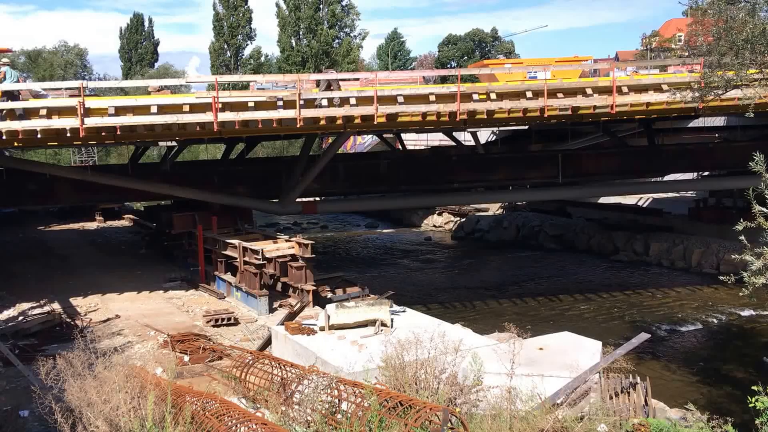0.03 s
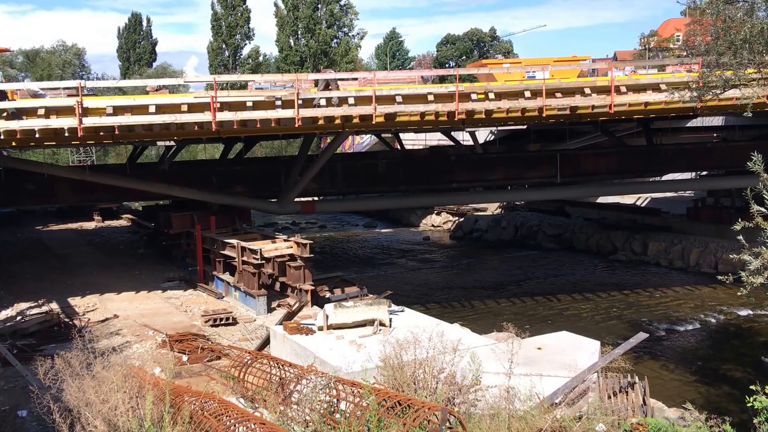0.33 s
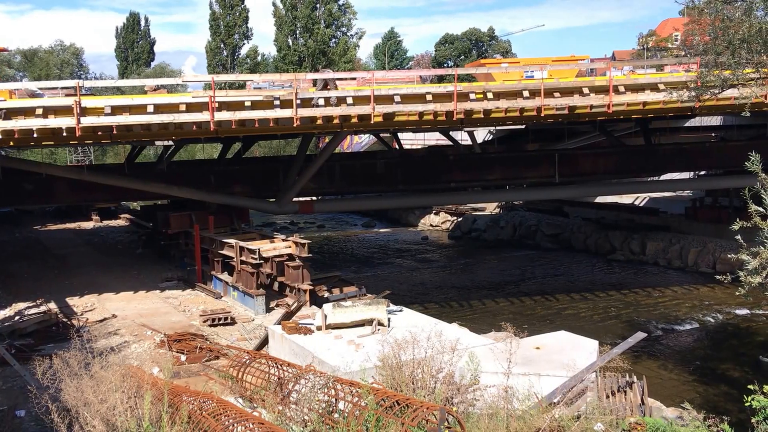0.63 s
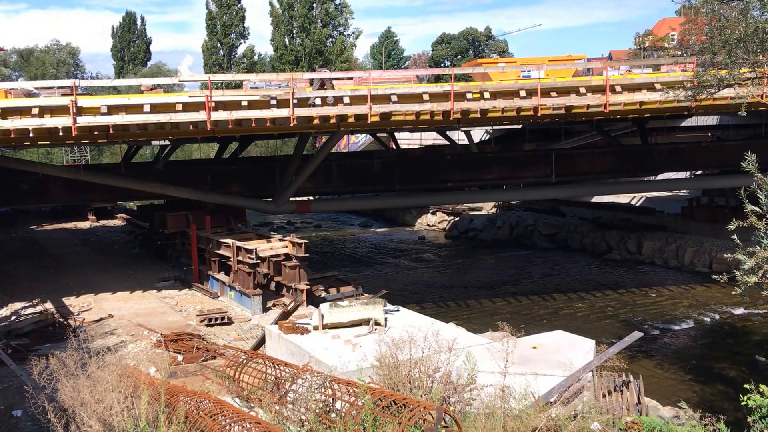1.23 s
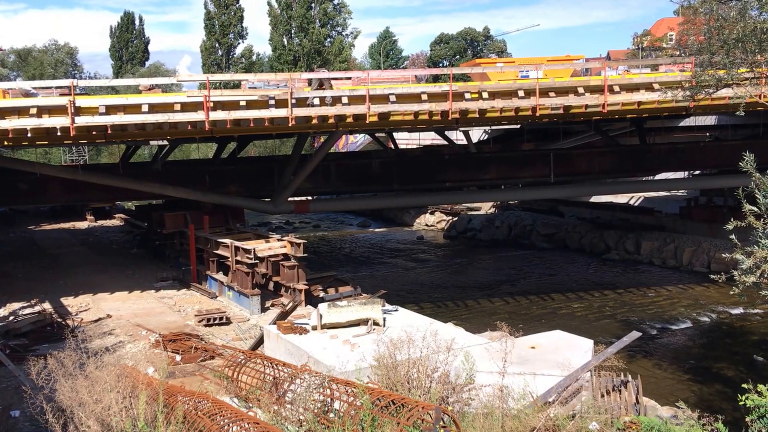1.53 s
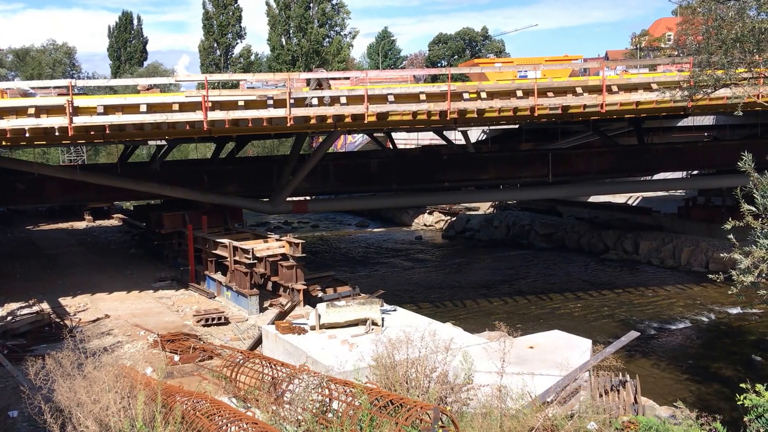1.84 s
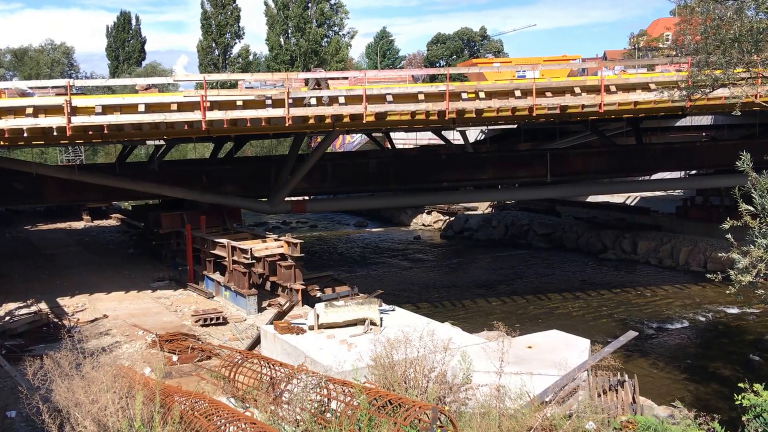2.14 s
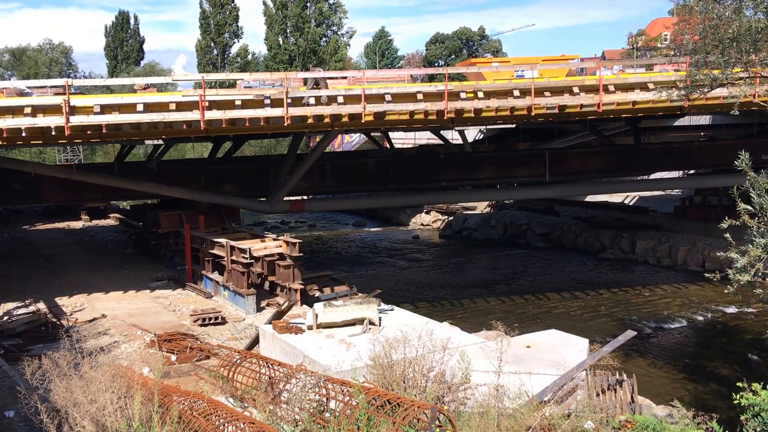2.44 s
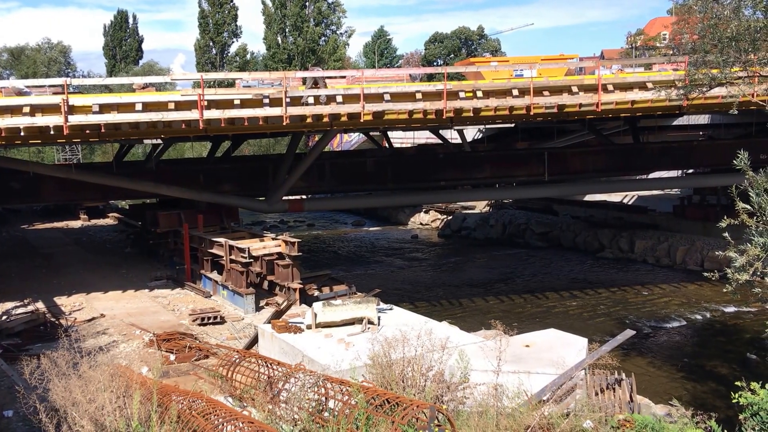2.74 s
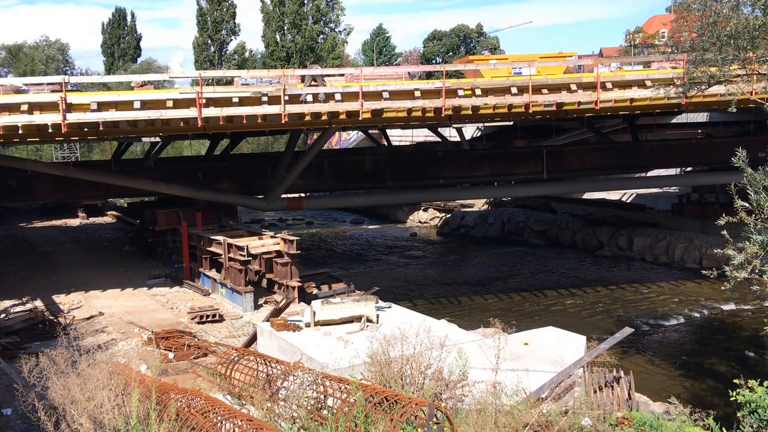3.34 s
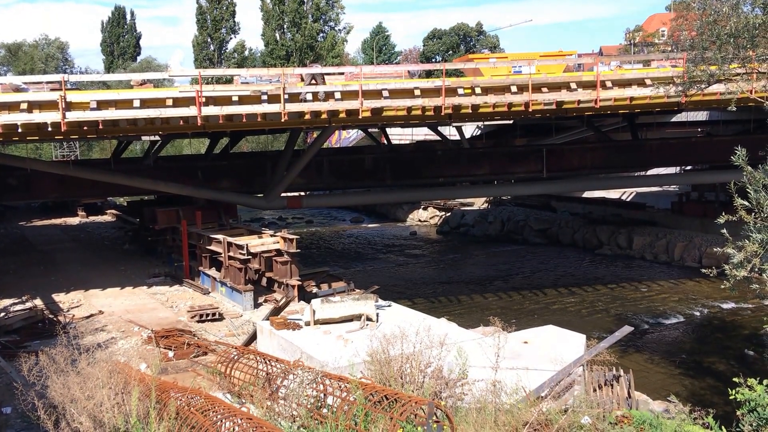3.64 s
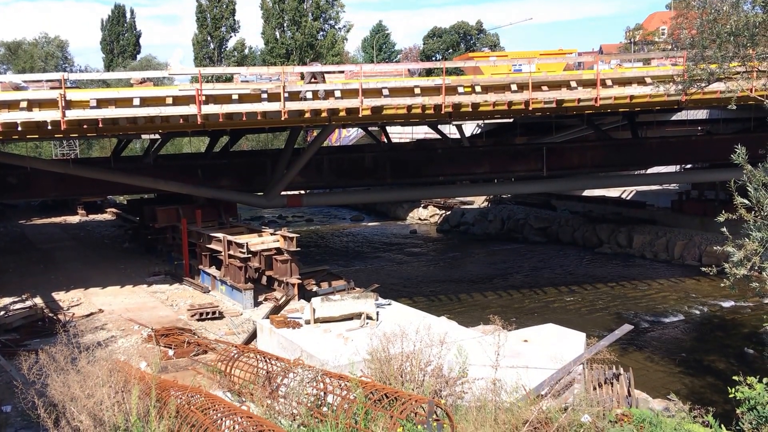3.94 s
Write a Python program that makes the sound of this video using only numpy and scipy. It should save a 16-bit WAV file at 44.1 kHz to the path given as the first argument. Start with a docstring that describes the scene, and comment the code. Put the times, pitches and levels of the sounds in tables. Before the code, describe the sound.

River water washes along while a far engine drones and a vehicle passes.

```python
"""A shallow river washes under a bridge from the start, over distant traffic and a heavy engine's drone.
From half a second on, a small bird gives thin, high chirps from the bank.
The tyre roar of one vehicle swells and passes around 2 s, as wheels begin to thud over distant bumps.
Near 2.7 s something dry rustles once nearby; the engine sinks in pitch and more traffic follows."""
import sys
import numpy as np
from scipy import signal
from scipy.fft import rfft, irfft
from scipy.io import wavfile
from scipy.ndimage import uniform_filter1d

SR = 44100
rng = np.random.default_rng(int(sys.argv[2]) if len(sys.argv) > 2 else 0)


def store_pcm(level_fs):
    """Save levels as 16-bit WAV."""
    pcm = np.round(np.clip(level_fs, -1, 1) * 32767).astype(np.int16)
    wavfile.write(sys.argv[1], SR, np.atleast_2d(pcm).T)


N = 176400
T = np.arange(N) / SR
FREQS = np.fft.rfftfreq(N, 1 / SR)


def amp(db):
    """Decibels to gain."""
    return 10 ** (np.asarray(db) / 20)


def unit(x):
    """Scales to rms 1."""
    return x / np.sqrt(np.mean(x ** 2) + 1e-20)


def colour(spectrum, hz):
    """Gain of an EQ curve at the given frequencies."""
    points_hz, db = np.transpose(spectrum)
    return amp(np.interp(np.log(hz + 1), np.log(points_hz + 1), db))


def fader(points):
    """Gain over time from a level curve."""
    return amp(np.interp(T, *np.transpose(points)))


def add(mix, start, sound):
    """Mixes a sound in at a time in seconds."""
    part = mix[round(start * SR):][:len(sound)]
    part += sound[:len(part)]


def noise(eq):
    """Noise of rms 1, shaped by a gain for each frequency."""
    return unit(irfft(rfft(rng.standard_normal(N)) * eq, N))


def drift(rate_hz):
    """Smooth random motion of rms 1."""
    return noise(np.exp(-(FREQS / rate_hz) ** 2))


def wash(spectrum, patchy_db, flicker_db):
    """Coloured noise of rms 1 with drifting patches and a flicker shared by all bands."""
    frames = signal.stft(rng.standard_normal(N), nperseg=512, noverlap=384)[2].T
    patches = uniform_filter1d(rng.standard_normal(frames.shape), size=20, axis=0)
    patches = unit(uniform_filter1d(patches, size=6, axis=1))
    flicker = unit(uniform_filter1d(rng.standard_normal(len(frames)), size=8))[:, None]
    frames *= amp(patchy_db * patches + flicker_db * flicker)
    moving = signal.istft(frames.T, nperseg=512, noverlap=384)[1][:N]
    return unit(irfft(rfft(moving) * colour(spectrum, FREQS), N))


# Tone of the water (frequency [Hz], relative level [dB])
RIVER_EQ = [(100, 1), (300, -3.5), (560, 2), (800, -1.5), (1100, -.5), (1750, -4.5), (2600, -12.5),
            (3150, -11.5), (3700, -13), (4500, -19), (6200, -20), (8100, -29.5), (9600, -25.5),
            (11200, -31), (15500, -47)]
# Surge of the riffles (time [s], level [dB])
RIVER_FADER = [(.1, -42.5), (1, -42), (2, -42.5), (3, -41.5), (4, -43.5)]


def river(splashes_per_s=900, splash_db=-55.5, spread_db=2, pitches=30):
    """A bed of rushing riffles, topped with tiny bubbles and splashes, each a few dying cycles."""
    bed = fader(RIVER_FADER) * wash(RIVER_EQ, patchy_db=.77, flicker_db=.73)
    t, splashes = T[:1024], np.zeros(N)
    for hz in np.geomspace(700, 9000, pitches):
        bubble = np.sin(2 * np.pi * hz * t) * np.exp(-t * hz / 5) * (1 - np.exp(-t * hz))
        sizes = amp(spread_db * np.minimum(rng.exponential(1, N), 5))
        triggers = rng.random(N) < splashes_per_s / pitches / SR
        splashes += colour(RIVER_EQ, hz) * hz * signal.oaconvolve(sizes * triggers, bubble)[:N]
    return bed + amp(splash_db) * unit(splashes)


# Deep rumble, tyre pass-by and low roar of the following traffic:
# their tone (frequency [Hz], relative level [dB])
RUMBLE_EQ = [(15, -29), (32, -22), (43, 1.5), (54, 4.5), (76, -4), (100, -6.5), (165, -8), (240, -14),
             (400, -24), (1000, -51.5)]
TYRES_EQ = [(100, 2), (300, 2.5), (600, 5.5), (950, 2.5), (1500, 1), (2200, -3.5), (3200, -20), (6000, -20),
            (14000, -52)]
ROAD_EQ = [(100, -8), (200, -3), (290, 2), (400, -2), (500, -6), (650, -10), (1000, -14.5), (3000, -45)]
# and their swells (time [s], level [dB])
RUMBLE_FADER = [(.1, -34), (.9, -35), (1.8, -33.5), (2.4, -34), (2.7, -35), (3.2, -34), (4, -35)]
TYRES_FADER = [(.1, -56), (1.2, -46.5), (1.55, -41), (1.9, -40.5), (2.25, -42), (2.6, -48), (4, -48)]
ROAD_FADER = [(.1, -58), (1.3, -50.5), (2.2, -53), (2.6, -48), (2.9, -44), (3.05, -40), (3.2, -45),
              (3.6, -43), (4, -46)]


def traffic():
    """Over a steady rumble, one vehicle's tyres roar past and more distant ones follow."""
    rumble = fader(RUMBLE_FADER) * wash(RUMBLE_EQ, patchy_db=1.3, flicker_db=.04)
    tyres = fader(TYRES_FADER) * wash(TYRES_EQ, patchy_db=.36, flicker_db=.6)
    road = fader(ROAD_FADER) * wash(ROAD_EQ, patchy_db=3.7, flicker_db=-.4)
    return rumble + tyres + road


# Sinking drone (time [s], firing rate [Hz], level [dB], overtone boost [dB])
ENGINE_DRONE = [(.1, 62.54, -50, -5), (.23, 62.53, -32, 5), (.6, 62.06, -32, -19), (.85, 63, -39.5, 4),
                (1.05, 62.7, -31.5, -6), (1.26, 62.99, -32.5, -3), (1.42, 62.63, -36.5, 0.5),
                (1.9, 62.38, -39.5, 13), (2.08, 61.78, -32.5, -2), (2.25, 61.93, -26, -6.5),
                (2.44, 61.56, -26.5, -8), (2.62, 61, -38.5, 1), (2.8, 57.8, -36, 2), (3.0, 54, -38.5, -2),
                (3.17, 50.15, -48.5, 14), (3.5, 49, -33.5, 9), (3.85, 49, -29.5, 1),
                (4, 48.87, -41.5, 10.5)]
# Overtones (multiple of the firing rate, level against the firing tone before the boost [dB])
ENGINE_ORDERS = [(1.5, -17.5), (2, -13.5), (2.5, -17)]


def engine(waver_db=.9, jitter=.00486):
    """A distant exhaust: the firing tone and its low orders, wavering on their way."""
    times, *columns = np.transpose(ENGINE_DRONE)
    firing_hz, db, boost_db = (np.interp(T, times, column) for column in columns)
    phase = 2 * np.pi * np.cumsum(firing_hz * (1 + jitter * drift(11.36))) / SR
    overtones = np.zeros(N)
    for order, order_db in ENGINE_ORDERS:
        gain = amp(order_db + waver_db * drift(6.8))
        overtones += gain * np.sin(order * phase + 2 * np.pi * rng.random())
    firing = amp(waver_db * drift(4.9)) * np.sin(phase)
    return np.sqrt(2) * amp(db) * (firing + amp(boost_db) * overtones)


# Thin calls (time [s], length [s], pitch [Hz], level [dB], octave against the pitch [dB])
BIRD_CHIRPS = [(.555, .014, 7250, -52, -25), (.96, .024, 7650, -55, -8), (.984, .018, 7580, -51.5, -4),
               (2.074, .028, 7130, -47, -7), (2.16, .016, 7000, -56, -22), (2.393, .024, 11050, -55, -40),
               (2.867, .014, 7220, -56, 3)]


def bird(fall=.02, rasp=.026):
    """Short, raspy, slightly falling chirps, each with its octave."""
    out = np.zeros(N)
    for start, length, hz, db, octave_db in BIRD_CHIRPS:
        progress = np.arange(0, 1, 1 / (length * SR))
        bend = 1 + fall * (.5 - progress) + rasp * drift(1000)[:len(progress)]
        phase = 2 * np.pi * np.cumsum(hz * bend) / SR
        tone = np.sin(phase) + amp(octave_db) * np.sin(2 * phase)
        add(out, start, amp(db) * np.sin(np.pi * progress) * tone)
    return out


def with_echo(sound, send_db=4, t60_s=.3, top_hz=7000):
    """The bridge and banks answer a sound with a short, duller tail."""
    t = T[:SR // 2]
    tail = rng.standard_normal(len(t)) * amp(-60 * t / t60_s)
    tail = signal.lfilter(*signal.butter(1, top_hz, fs=SR), tail / np.linalg.norm(tail))
    return sound + signal.fftconvolve(amp(send_db) * sound, tail)[:N]


# Soft tonal swells (peak time [s], half length [s], pitch [Hz], level [dB])
TRAFFIC_HUMS = [(.85, .17, 275, -44.5), (1.72, .3, 278, -45), (1.7, .12, 357, -50), (2.25, .17, 357, -42)]


def hums(jitter=.0028):
    """Faint, slightly unsteady hums rise out of the traffic and sink back."""
    out = np.zeros(N)
    for peak, half_length, hz, db in TRAFFIC_HUMS:
        swell = amp(db) * np.exp(-((T - peak) / half_length) ** 2)
        out += swell * np.sin(2 * np.pi * np.cumsum(hz * (1 + jitter * drift(19.9))) / SR)
    return out


# Dull low hits (time [s], level [dB])
WHEEL_THUDS = [(1.752, -32), (2.118, -28), (2.992, -32), (3.236, -28)]


def thuds(hz=61.7, rise_s=.0091, knock_db=-8.5):
    """Wheels hit distant bumps: a few low cycles with a weaker knock an octave above."""
    out, t = np.zeros(N), T[:SR // 5]
    envelope = (t / rise_s * np.exp(1 - t / rise_s)) ** 2
    for start, db in WHEEL_THUDS:
        body = np.sin(2 * np.pi * (hz * t + rng.random()))
        knock = amp(knock_db) * np.sin(2 * np.pi * (2 * hz * t + rng.random()))
        add(out, start, amp(db) * envelope * (body + knock))
    return out


# Pinpoints of treble (time [s], level [dB])
DRY_TICKS = [(2.056, -58), (3.491, -44), (3.57, -55), (3.59, -57)]


def ticks(centre_hz=14640, width_hz=1400, decay_s=.0015):
    """Tiny dry ticks close by, each a snap of high fizz that dies at once."""
    fizz = noise(np.exp(-((FREQS - centre_hz) / width_hz) ** 2 / 2))
    return fizz * sum(amp(db) * (T >= at) * np.exp(-abs(T - at) / decay_s) for at, db in DRY_TICKS)


# Crisp tone of the rustle (frequency [Hz], relative level [dB])
RUSTLE_EQ = [(1500, -18), (4000, 2), (7000, 1.5), (9500, .5), (12500, .5), (15500, -2)]
# Its quick rise and fade (time [s], level [dB])
RUSTLE_FADER = [(2.66, -76), (2.685, -54), (2.71, -48.5), (2.755, -54), (2.83, -63), (3.1, -76)]


def rustle():
    """Something dry stirs nearby with one brief, bright hiss."""
    return fader(RUSTLE_FADER) * wash(RUSTLE_EQ, patchy_db=3, flicker_db=0)


def scene():
    """The mono mix, as heard from the bank."""
    return (river() + traffic() + engine() + with_echo(bird()) + hums() + thuds() + ticks() + rustle())[None]


# Narrow dips in the microphone's treble (frequency [Hz], half width [Hz], gain [dB])
MIC_NOTCHES = [(4920, 200, -4.5), (10360, 260, -5.5)]


def record(dry, low_cut_hz=32, start_s=.084, top_hz=15800):
    """The microphone notches the treble and trims both extremes; the sound cuts in after a short silence."""
    notches = amp(sum(db * np.exp(-((FREQS - hz) / width) ** 2) for hz, width, db in MIC_NOTCHES))
    low_cut = 1 / np.sqrt(1 + (low_cut_hz / (FREQS + 1)) ** 10)
    coloured = irfft(rfft(dry) * notches * low_cut, N)
    gate = np.clip((T - start_s) * SR / 64, 0, 1)
    high_cut = signal.firwin(511, top_hz, window=("kaiser", 9), fs=SR)
    return signal.oaconvolve(coloured * gate, high_cut[None], "same")


dry = scene()
out = record(dry)
store_pcm(out)
```